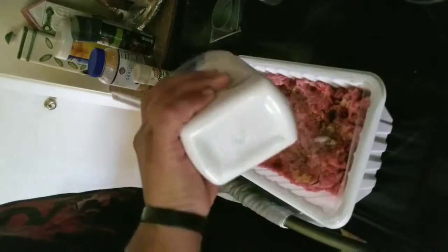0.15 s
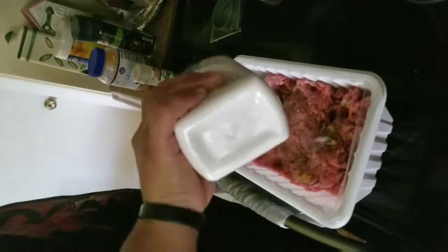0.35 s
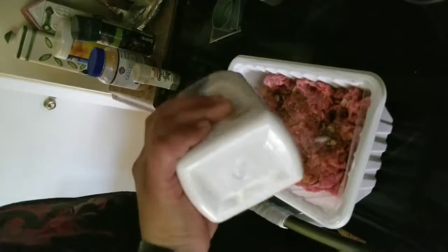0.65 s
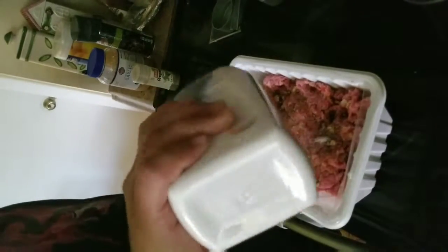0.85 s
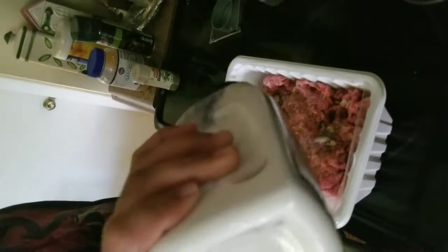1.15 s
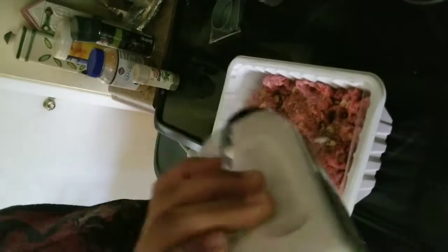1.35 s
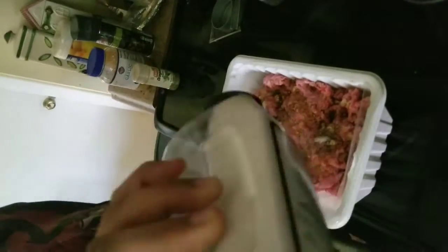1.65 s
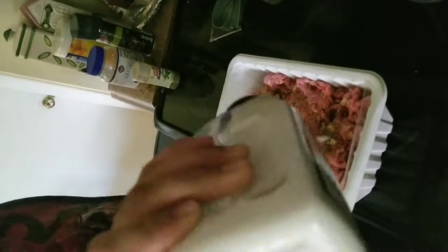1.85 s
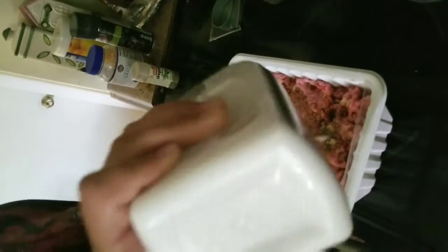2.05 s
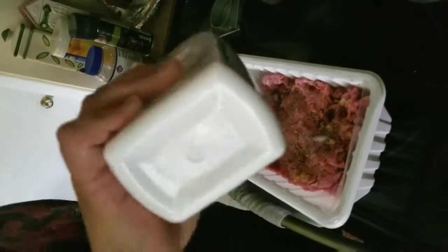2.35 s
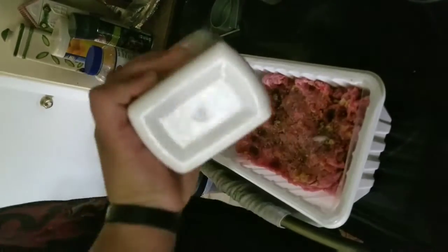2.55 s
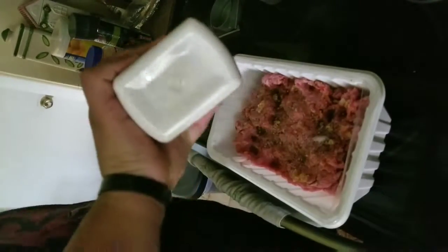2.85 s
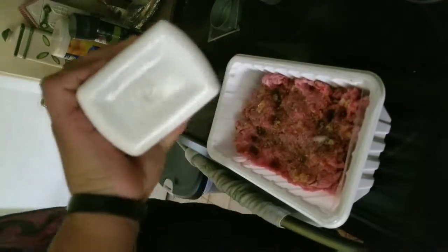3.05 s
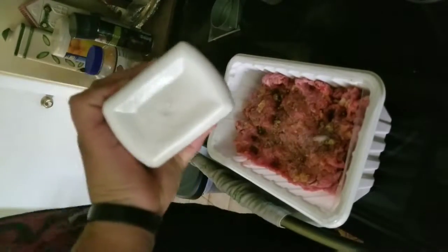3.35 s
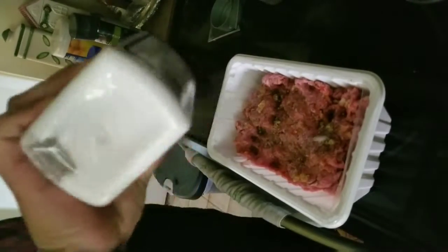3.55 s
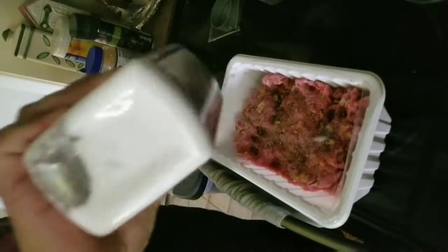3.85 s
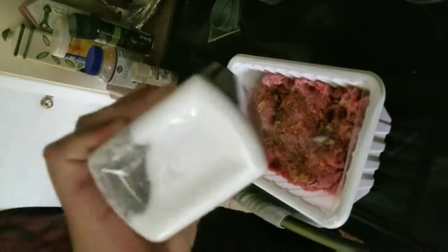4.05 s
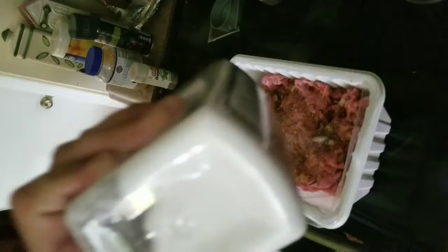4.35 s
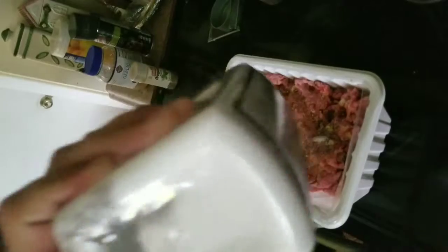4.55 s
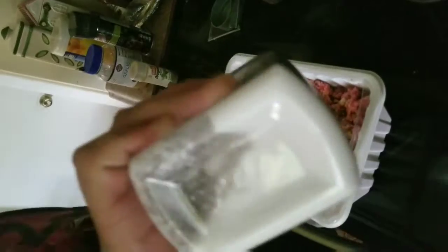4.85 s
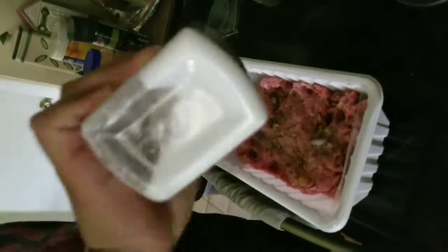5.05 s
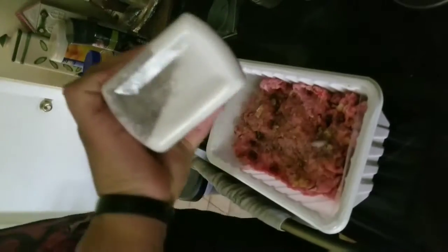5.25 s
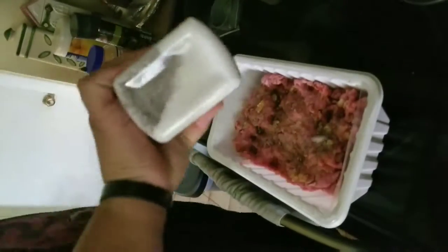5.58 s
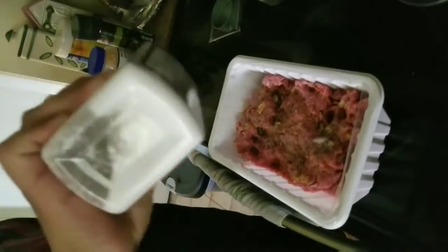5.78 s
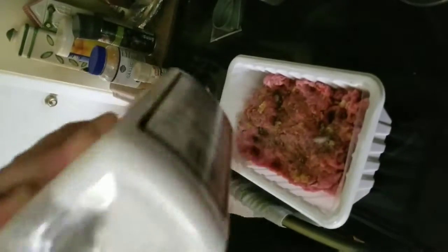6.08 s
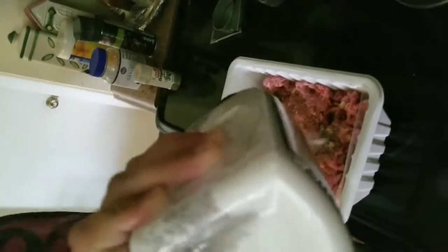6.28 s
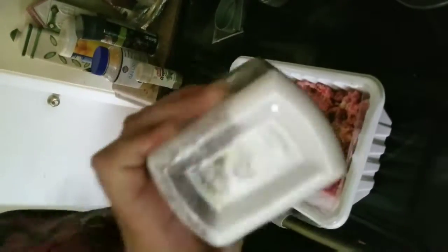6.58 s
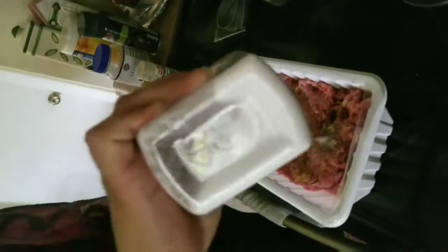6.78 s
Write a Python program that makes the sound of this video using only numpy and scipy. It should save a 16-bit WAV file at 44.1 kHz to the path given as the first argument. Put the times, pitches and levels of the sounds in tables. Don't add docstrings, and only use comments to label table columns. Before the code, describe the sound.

A plastic tub of salt is shaken by hand very close to a stereo microphone in a small kitchen. At first the grains mostly swish and hiss with light taps; around three seconds clumps knock sharply, then heavier hollow thumps and loud slaps follow in uneven bursts. One tiny squeak slips in late. A refrigerator hums softly below.

```python
import sys
import numpy as np
from scipy import signal
from scipy.fft import rfft, irfft, next_fast_len
from scipy.io import wavfile
from scipy.ndimage import map_coordinates

SR = 44100
rng = np.random.default_rng(int(sys.argv[2]) if len(sys.argv) > 2 else 0)


def magnitude_from_level(level_db):
    exponent = np.asarray(level_db, float) / 20
    return 10 ** exponent


def store_pcm(level_fs):
    pcm = np.round(np.clip(level_fs, -1, 1) * 32767).astype(np.int16)
    wavfile.write(sys.argv[1], SR, np.atleast_2d(pcm).T)


N = 305039

# mode_hz [Hz], width_hz [Hz], level_db [dB]
TUB_MODES = [(491, 32, -10), (800, 400, 3), (894, 64, -13), (1110, 120, -9), (1390, 240, -7),
             (1780, 450, 8.5), (2050, 130, 4), (2310, 175, 4.5), (2750, 450, 4.5), (3360, 540, -2),
             (4100, 150, -13)]
WALL_SPLIT_HZ = 1500


def rms_one(x):
    return x / np.sqrt(np.mean(x ** 2) + 1e-20)


def in_time(rows):
    s, values = np.transpose(rows)
    return np.interp(np.arange(N) / SR, s, values)


def bins_hz():
    return np.maximum(np.arange(N // 2 + 1) * SR / N, 1)


def at_hz(points, hz):
    point_hz, values = np.array(points).T
    return np.interp(np.log(hz), np.log(np.maximum(point_hz, 1)), values)


def drift(rate_hz):
    r = np.exp(-2 * np.pi * rate_hz * 40 / SR)
    noise = rng.standard_normal(N // 40 + 2002)
    slow = rms_one(signal.lfilter([1], [1, -2 * r, r * r], noise)[2000:])
    return np.interp(np.arange(N) / 40, np.arange(len(slow)), slow)


def resonance(x, hz, width_hz):
    r = np.exp(-np.pi * width_hz / SR)
    poles = [1, -2 * r * np.cos(2 * np.pi * hz / SR), r * r]
    return signal.lfilter(np.array([1, 0, -1]) * (1 - r * r) / 2, poles, x)


def grains(length, per_s, spread_db):
    born = rng.random(length) < per_s / SR
    sizes = magnitude_from_level(spread_db * np.minimum(rng.exponential(1, length), 5))
    return rms_one(born * sizes * rng.choice([-1, 1], length)) + 1e-18


def colour(x, spectrum):
    return irfft(rfft(x) * magnitude_from_level(at_hz(spectrum, bins_hz())), N)


def surges():
    # peak_s [s], hiss_db [dB], build_s [s
    # per 20 dB, sudden if 0 or less], lumps_db [dB against hiss]
    strokes = [(-0.005, -59, 0.012, -5.5), (0.161, -56, 0.23, -1), (0.252, -53, 0.16, -3.5),
               (0.348, -52, -0.08, 3.5), (0.411, -48, 0.147, -2.5), (0.509, -47.5, 0.05, -4),
               (0.643, -57.5, 0.2, -1.5), (0.902, -74, 2, 5), (1.022, -60, 0.18, -4), (1.084, -51, 0.06, 1),
               (1.411, -48.5, 0.026, -2), (1.491, -50.5, 0.15, -1.5), (1.576, -55, 0.03, 1),
               (1.788, -51.5, 0.033, -0.5), (1.863, -51, 0.11, 2), (1.981, -60.5, 0.37, 0.5),
               (2.121, -65, 0.2, 2), (2.193, -55.5, 0.196, 1), (2.545, -59, 0.096, -3.5),
               (2.774, -54.5, 0.18, -3), (2.912, -65, 0.2, 5), (2.962, -50, 0.12, 0.0), (3.024, -54, 0.12, 3),
               (3.074, -58, 0.5, 3), (3.36, -58.0, 0.13, -8),
               (3.535, -55, 0.1, 8.5), (3.645, -51, 0.02, 5.5), (3.691, -54.5, 0.08, 7.5),
              (3.77, -53, 0.1, 7.5), (4.04, -56.5, 0.09, 7), (4.125, -49, 0.16, 1), (4.302, -58, 0, -6),
              (4.381, -59, -0.03, -3), (4.417, -47.5, 0.03, -3), (4.481, -44.5, 0.07, -2),
              (4.782, -49.5, 0.02, 7), (4.852, -48, 0.08, 3.5), (5.144, -57, -0.16, 5),
              (5.19, -55, 0.04, 1), (5.469, -59.5, 0.05, 0.5), (5.523, -54, 0.04, 1),
              (5.608, -50, 0.085, -1.5), (5.708, -54, -0.02, -4), (5.799, -59.5, 0.16, 1.5),
              (5.897, -57, 0.11, 2.5), (5.965, -53, 0.05, 3), (6.245, -48, 0.02, 2),
              (6.343, -46.5, 0.13, 0), (6.597, -50.5, 0.02, -0.5), (6.689, -51, 0.06, 1),
              (6.732, -49, 0.14, 0)]
    settle_s, trickle_s = 0.082, 0.27
    trickle_db, rest_db = -12.5, -80
    t = np.arange(0, N + 64, 64) / SR
    peak_s, hiss_db, build_s, lumps_db = np.transpose(strokes)[:, :, None]
    before, after = np.maximum(peak_s - t, 0), np.maximum(t - peak_s, 0)
    dying = magnitude_from_level(-40 * after / settle_s) + magnitude_from_level(2 * trickle_db - 40 * after / trickle_s)
    power = magnitude_from_level(2 * hiss_db - 40 * before / np.maximum(build_s, 0.006)) * dying
    levels = []
    for share in (power, power * magnitude_from_level(2 * lumps_db)):
        level_db = 10 * np.log10(share.sum(axis=0) + magnitude_from_level(2 * rest_db))
        levels.append(np.interp(np.arange(N) / SR, t, level_db))
    return levels


def fine_hiss(level_db):
    # hz [Hz], level_db [dB per Hz]
    scratch = [(1200, -11), (2400, 5.5), (3300, 1.5), (4600, 0), (7600, 0), (9400, -4), (12400, -1),
               (14600, -0.5), (15800, 5)]
    # start_s [s], tilt_db [dB per band]
    facing = [
        (0, 1.5),
        (1.5, 0.64),
        (3.2, 0.5),
        (4.2, -0.65),
        (5.5, 1),
        (6.92, -0.4),
    ]
    shared, left, right = (grains(N, 9000, spread_db=1.5) for k in range(3))
    sides = colour(np.array([left, right]) * 36.0 + shared, scratch)
    tilt_db = in_time(facing)
    edges = np.geomspace(1000, 17000, 8)
    patchy = np.zeros((2, N))
    for k, pair in enumerate(zip(edges, edges[1:])):
        band = signal.sosfilt(signal.butter(2, pair, "band", fs=SR, output="sos"), sides)
        patchy += band * magnitude_from_level(1.7 * drift(14) + tilt_db * (k - 4)) * (-1) ** k
    return rms_one(patchy) * magnitude_from_level(level_db + 1.2 * drift(33))


def heap_rumble(broad_db, narrow_db):
    walls = np.zeros((2, 2, N))
    for hz, width_hz, mode_db in TUB_MODES:
        shared, left, right = (grains(N, 600, spread_db=3.0) for k in range(3))
        knocks = shared + hz / 1400 * np.array([left, right])
        knocks = knocks * magnitude_from_level(mode_db + 2.6 * drift(18))
        walls[int(hz > WALL_SPLIT_HZ)] += resonance(knocks, hz, width_hz) / np.sqrt(width_hz)
    return rms_one(walls[0]) * magnitude_from_level(broad_db) + rms_one(walls[1]) * magnitude_from_level(narrow_db)


def struck_walls(shower, note_hz):
    walls = np.zeros((2, 2, len(shower)))
    high = int(note_hz > WALL_SPLIT_HZ)
    note = resonance(shower, note_hz, 0.089 * note_hz) * magnitude_from_level(13.5) / np.sqrt(0.2 * note_hz)
    walls[high] += note * np.array([[1], [-1]]) ** high
    for mode_hz, width_hz, mode_db in TUB_MODES:
        high = int(mode_hz > WALL_SPLIT_HZ)
        side = rng.choice([-1, 1], (2, 1)) ** high
        gain = magnitude_from_level(mode_db + rng.normal(0, 3.5, (2, 1))) * side
        walls[high] += resonance(shower, mode_hz, width_hz) * gain / np.sqrt(width_hz)
    return rms_one(walls[0]), rms_one(walls[1])


def slams():
    # [dB
    wall_blows = [(0.24, -43.5, 485, -3), (0.341, -41, 2320, -6.5), (0.506, -33.5, 1740, -1),
                  (0.631, -43, 533, -5), (0.892, -43.5, 616, 4), (1.02, -38.5, 1440, -10),
                  (1.072, -30, 2460, 6), (1.14, -39.5, 654, 2), (1.427, -30.5, 2060, -5),
                  (1.479, -40, 2090, 3), (1.494, -32.5, 940, -8), (1.765, -43, 810, -24),
                  (1.869, -42, 2300, -1), (2.405, -41.5, 630, -8), (2.853, -37, 1360, -6),
                  (2.876, -41, 2000, 0), (2.908, -35.5, 2050, 8), (2.955, -27.5, 1730, -2),
                  (3.009, -27.5, 2050, 22.5), (3.059, -32, 1360, -14), (3.082, -23, 1340, -11.5),
                  (3.358, -31, 2050, 8), (3.522, -28.5, 1950, -2), (3.54, -30.5, 2040, 10),
                  (3.638, -32, 2200, 9), (3.668, -33, 2230, 8), (3.697, -28, 2230, -8.5),
                  (3.748, -23, 924, -11),
                  (4.048, -23.5, 533, -23), (4.11, -31.5, 467, -11), (4.127, -27.5, 1030, -10.5),
                  (4.15, -31.5, 1000, -12), (4.297, -39, 2300, 5), (4.379, -33.5, 635, -23),
                  (4.414, -21.5, 484, -9), (4.48, -21.5, 760, -9.5), (4.491, -23, 740, -14),
                  (4.504, -22.5, 1110, -9), (4.779, -26, 2000, -4), (4.849, -21, 1110, -7.5),
                  (4.879, -40, 1600, -2), (5.186, -27, 2050, -7), (5.52, -30, 656, -4.5),
                  (5.598, -32, 2020, -1), (5.614, -22.5, 940, -9), (5.719, -39, 1480, -23),
                  (5.882, -41, 615, -26), (5.969, -34, 2250, -6), (6.238, -36.5, 616, -19),
                  (6.263, -28, 680, -13), (6.349, -21.5, 1030, -7.5), (6.37, -28, 2310, 15),
                  (6.622, -24, 800, -29), (6.683, -39, 2300, -1), (6.724, -31, 796, -11),
                  (6.736, -25.5, 1040, -10.5), (6.748, -24, 1120, -6), (6.795, -30, 2310, 2)]
    shower_t60_s = 0.065
    thud_db, thud_grows = -8.5, 0.26
    out, t = np.zeros((2, N)), np.arange(5000) / SR
    soften = signal.butter(2, 5000, fs=SR, output="sos")
    for start_s, peak_db, note_hz, narrow_db in wall_blows:
        at = round((start_s + 0.001004) * SR)
        shower = 0.22 * grains(len(t), 1800, spread_db=3.5) * magnitude_from_level(-60 * (t / shower_t60_s) ** 1.127)
        shower[0] += 1.9
        shower = signal.sosfilt(soften, shower)
        broad, narrow = struck_walls(shower, note_hz)
        thud = rms_one(resonance(shower, 246, 290)) * magnitude_from_level(thud_db + thud_grows * (peak_db + 33.5))
        rung = broad + magnitude_from_level(1.46 * narrow_db + 12) * narrow + thud
        out[:, at:at + len(t)] += (rung / np.abs(rung).max() * magnitude_from_level(peak_db))[:, :N - at]
    return out


def ticks():
    # start_s [s], peak_db [dB], t60_s [s]
    sprays = [(0.3441, -44, 0.03), (0.505, -39, 0.033), (0.7307, -41, 0.058), (0.9971, -64, 0.03),
              (1.073, -54, 0.027), (1.3932, -60, 0.03), (1.92, -38, 0.028), (2.4062, -44, 0.03),
              (2.539, -41, 0.022), (2.956, -46, 0.03), (3.0094, -47.5, 0.027), (3.3583, -46, 0.03),
              (3.6391, -40, 0.03), (4.2981, -49, 0.036), (4.3774, -49, 0.03), (4.4159, -32, 0.025),
              (4.777, -40, 0.033), (4.9243, -36.5, 0.052), (5.2653, -45.5, 0.066), (5.4612, -36, 0.039),
              (5.7033, -46, 0.037), (5.8571, -42, 0.03), (6.1379, -52, 0.064), (6.222, -37, 0.042),
              (6.5787, -39, 0.054), (6.6827, -36, 0.03)]
    out, t = np.zeros((2, N)), np.arange(6000) / SR
    for start_s, peak_db, t60_s in sprays:
        at = round(start_s * SR)
        fading = magnitude_from_level(peak_db - 10.0 - 60 * t / max(t60_s, 0.005))
        out[:, at:at + len(t)] += fading * rng.standard_normal((2, len(t)))
    return signal.sosfilt(signal.butter(2, 1800, "highpass", fs=SR, output="sos"), out)


def placed(x):
    # start_s [s], lead [samples]
    left_lead = [
        (0, 0),
        (.7, 2.5),
        (1.2, 6.0),
        (3.2, 8.0),
        (4.8, 8.0),
        (5.2, 4.5),
        (6.2, 9.0),
        (6.92, 7.0),
    ]
    heard_at = np.arange(N) - in_time(left_lead)
    return np.array([x[0], map_coordinates(x[1], [heard_at], order=3, mode="nearest")])


def squeak():
    # start_s [s], peak_db [dB], pitch_hz [Hz], t60_s [s]
    rubs = [
        (5.428, -30, 3340, 0.024),
        (5.437, -29, 3240, 0.029),
    ]
    out, t = np.zeros(N), np.arange(3000) / SR
    for start_s, peak_db, pitch_hz, t60_s in rubs:
        at = round(start_s * SR)
        noise = rng.standard_normal(len(t))
        rub = rms_one(resonance(resonance(noise, pitch_hz, 1200), pitch_hz, 1200))
        rub = rub * np.minimum(t / 0.0027, 1)
        out[at:at + len(t)] += rub * magnitude_from_level(peak_db - 17.0 - 60 * t / t60_s)
    return out * magnitude_from_level([[-8], [3]])


def kitchen(x):
    t60_s, wall_cut_hz = 0.25, 10000
    size = next_fast_len(N + SR)
    w = 2 * np.pi * np.arange(size // 2 + 1) / size
    dull = np.abs(1 / (1 + 1j * w * SR / (2 * np.pi * wall_cut_hz))) ** 0.5
    answer = np.zeros((2, len(w)), complex)
    lags = (rng.uniform(0.004, 0.046, 16) * SR).astype(int)
    for k, lag in enumerate(lags):
        loop = magnitude_from_level(-60 * lag / SR / t60_s) * dull * np.exp(-1j * w * lag)
        answer[k % 2] += loop / (1 - loop) * (-1) ** (k // 2)
    return irfft(rfft(x, size) * answer, size)[:, :N]


def room_air():
    # hz [Hz], level_db [dB per Hz]
    air_spectrum = [(12, -14), (20, -4), (93, 0), (363, -6), (429, -11.5), (633, -16), (708, -21),
                    (1020, -23), (1340, -32), (1590, -27), (3190, -36), (13200, -81), (15600, -54)]
    # hz [Hz], likeness [0 to 1]
    likeness = [(30, 0.94), (130, 0.98), (290, 0.7), (640, 0.34), (1400, 0), (15000, 0.4)]
    # centre_s [s], swell_db [dB]
    swells = [
        (0.52, 7.5),
        (2.1, 3),
        (2.6, 2),
        (3.62, 13),
        (4.3, 6),
        (4.801, 8.5),
        (5.9, 2),
        (6.55, 5),
        (6.8, 5),
    ]
    air_db, swell_s = -46.5, 0.052
    hz, t = bins_hz(), np.arange(N) / SR
    alike = np.clip(at_hz(likeness, hz), 0, 1)
    mid, side = rfft(rng.standard_normal((2, N)))
    pair = np.sqrt(1 + alike) * mid + np.sqrt(1 - alike) * side * [[1], [-1]]
    air = magnitude_from_level(air_db - 2.5) * rms_one(irfft(pair * magnitude_from_level(at_hz(air_spectrum, hz)), N))
    swell_db = 3 * drift(2.45)
    for centre_s, peak_db in swells:
        swell_db += peak_db * np.exp(-((t - centre_s) / swell_s) ** 2)
    low = signal.sosfilt(signal.butter(1, 110, fs=SR, output="sos"), air)
    return air + low * (magnitude_from_level(swell_db - 1.0) - 1)


def refrigerator():
    # hz [Hz], width_hz [Hz], level_db [dB]
    hum_bands = [(58.6, 16.4, -55), (116.7, 14.4, -56), (266, 47, -62.5), (355.1, 9.4, -65),
                 (622.8, 18, -69)]
    tone_hz, tone_db = 359.7, -58
    hum = magnitude_from_level(tone_db + 1.2 * drift(2.0)) * np.sin(2 * np.pi * tone_hz * np.arange(N) / SR)
    for hz, width_hz, level_db in hum_bands:
        noise = rng.standard_normal(N + SR)
        band = resonance(resonance(noise, hz, width_hz), hz, width_hz)[SR:]
        hum += magnitude_from_level(level_db) * rms_one(band)
    return hum


def scene():
    hiss_db, lumps_db = surges()
    broad_db = -60 + 0.5 * (lumps_db + 59)
    narrow_db = -62 + 0.9 * (lumps_db + 60)
    pan_db = -0.6 + 0.07 * (hiss_db + 61.5)
    tub = fine_hiss(hiss_db + 3.5) + heap_rumble(broad_db, narrow_db) + slams() + ticks()
    near = placed(tub) * magnitude_from_level(np.array([pan_db, -pan_db])) + squeak()
    return near + magnitude_from_level(-13.5) * kitchen(near.mean(axis=0)) + room_air() + refrigerator()


def top_cut(x):
    return signal.sosfilt(signal.butter(12, 15740, fs=SR, output="sos"), x)


def record(dry):
    # hz [Hz], tilt_db [dB]
    mic_tilt = [(60, -4), (110, -5.5), (200, 2.5), (380, 3), (700, 2.5), (1290, 3), (2380, -2),
                (4400, -2.5), (8120, 4.5), (15000, -4.5)]
    hz = bins_hz()
    tilt_db = at_hz(mic_tilt, hz) * hz / (hz + 150)
    tilted = irfft(rfft(dry) * magnitude_from_level(tilt_db * np.array([[0.3], [-0.3]])), N)
    mix = signal.sosfilt(signal.cheby2(14, 55, 15720, fs=SR, output="sos"), tilted)
    return top_cut(mix)


dry = scene()
out = record(dry)
store_pcm(out)
```